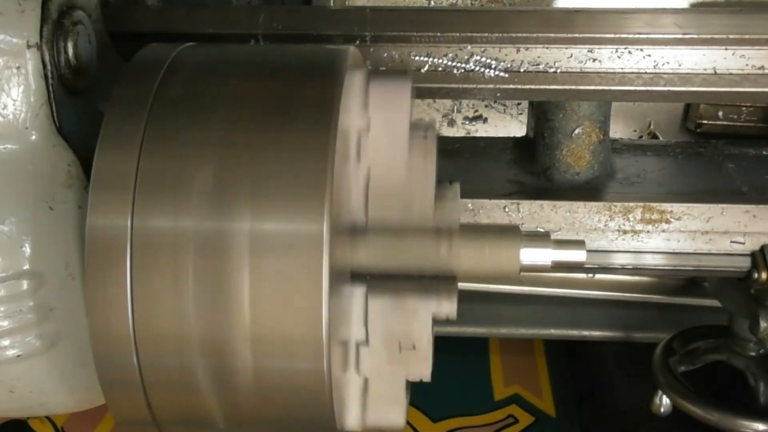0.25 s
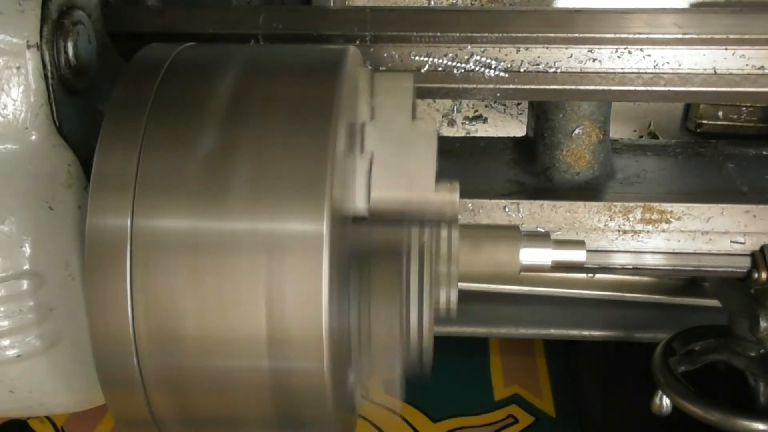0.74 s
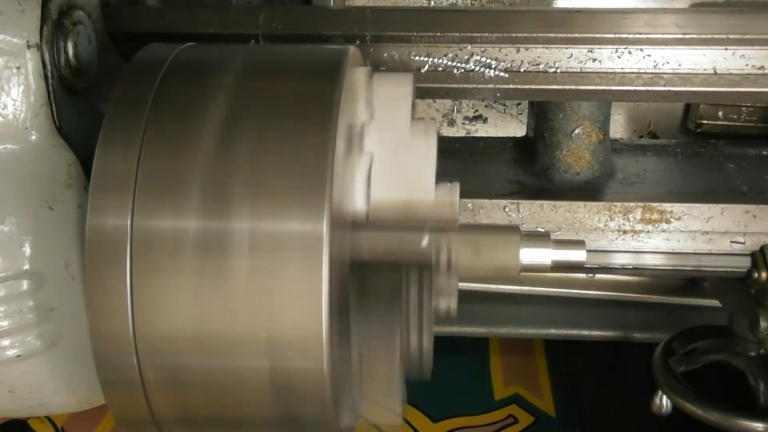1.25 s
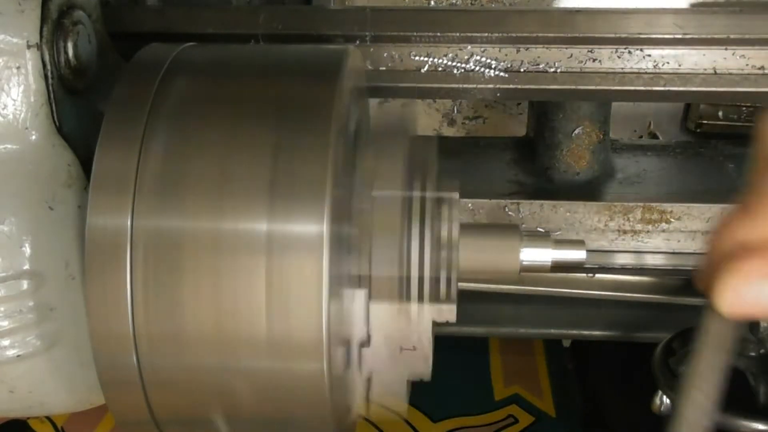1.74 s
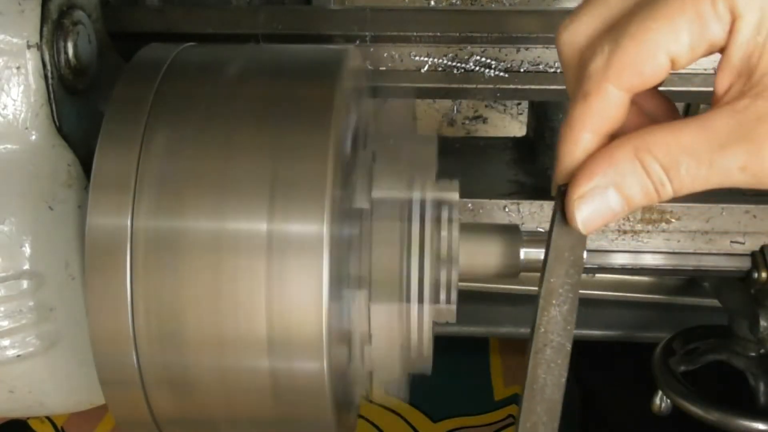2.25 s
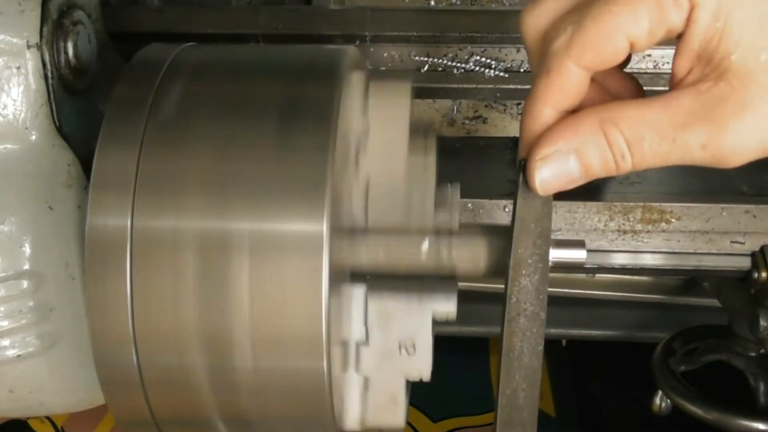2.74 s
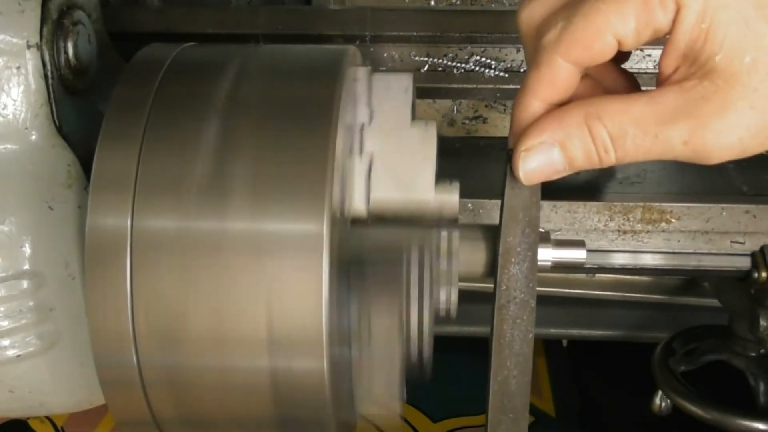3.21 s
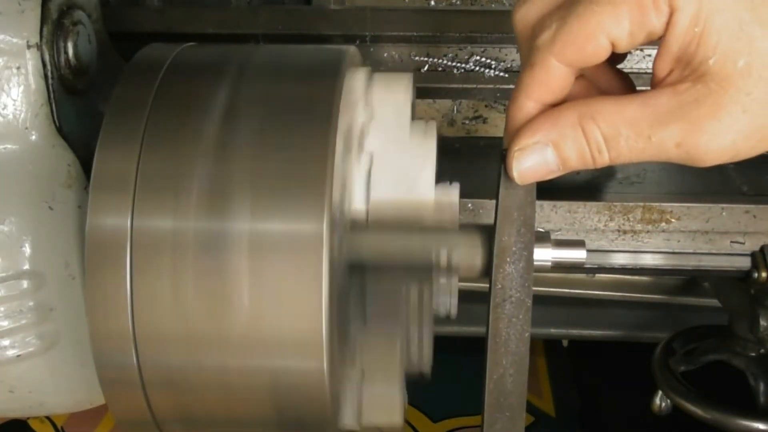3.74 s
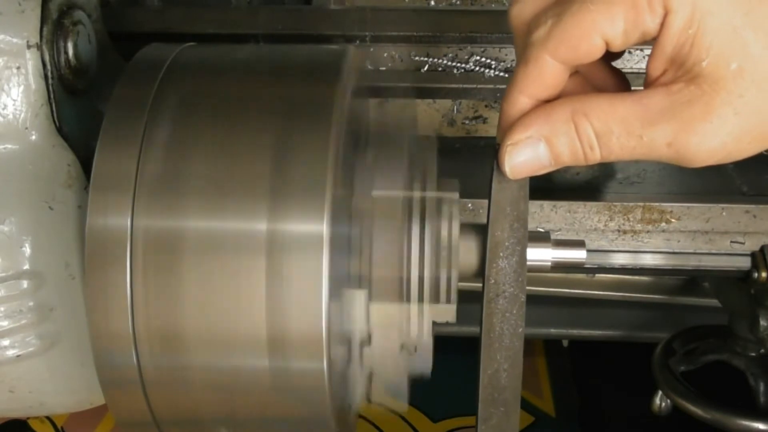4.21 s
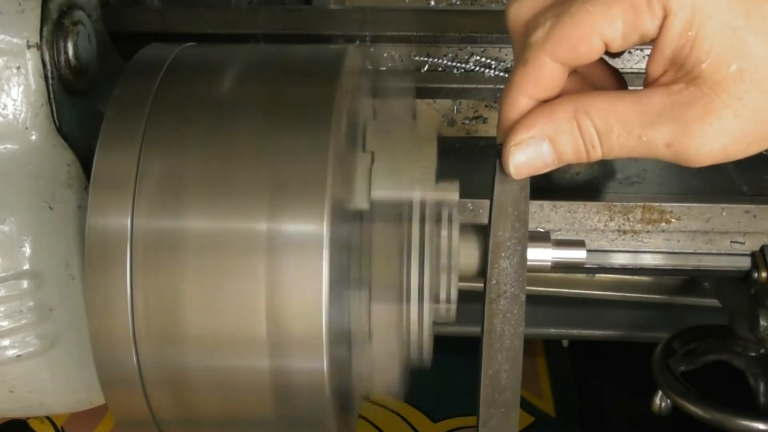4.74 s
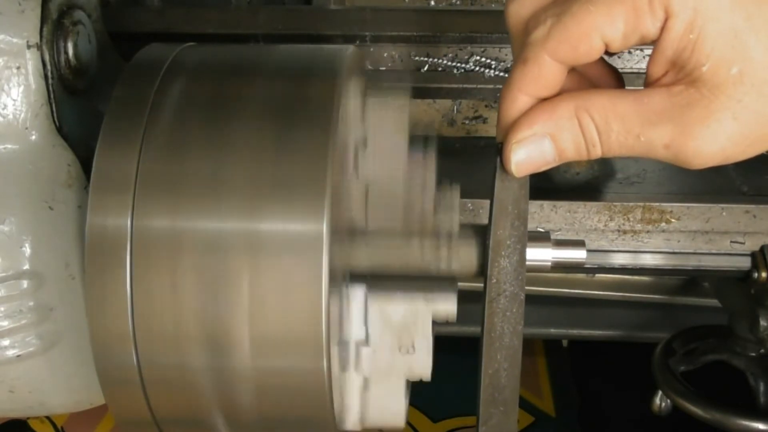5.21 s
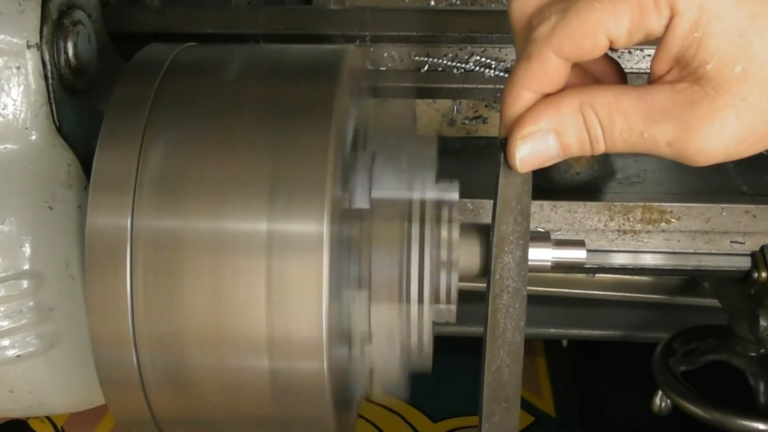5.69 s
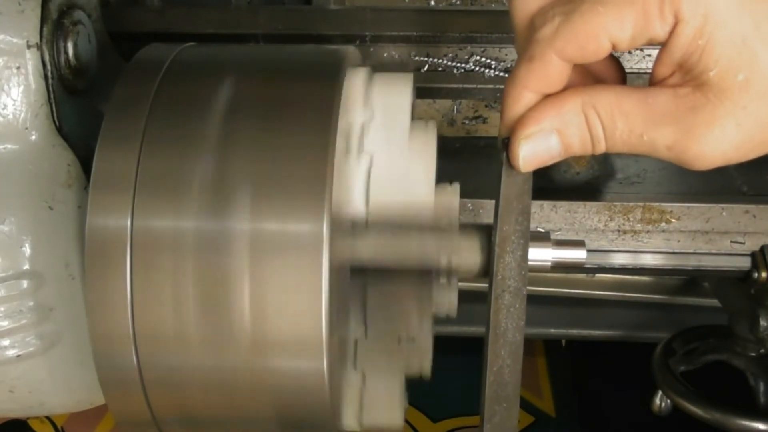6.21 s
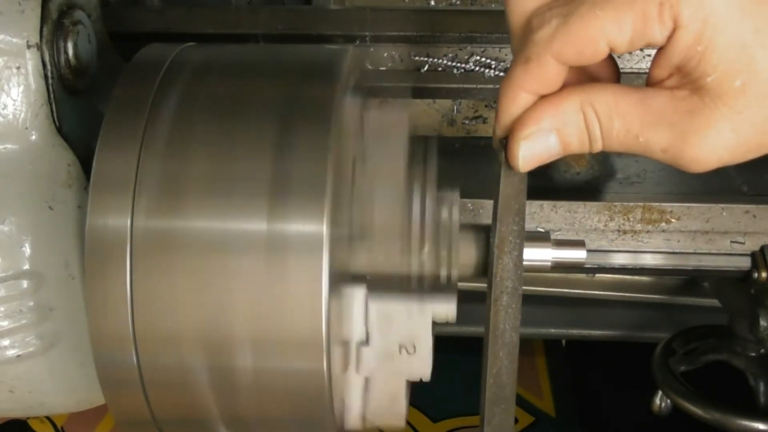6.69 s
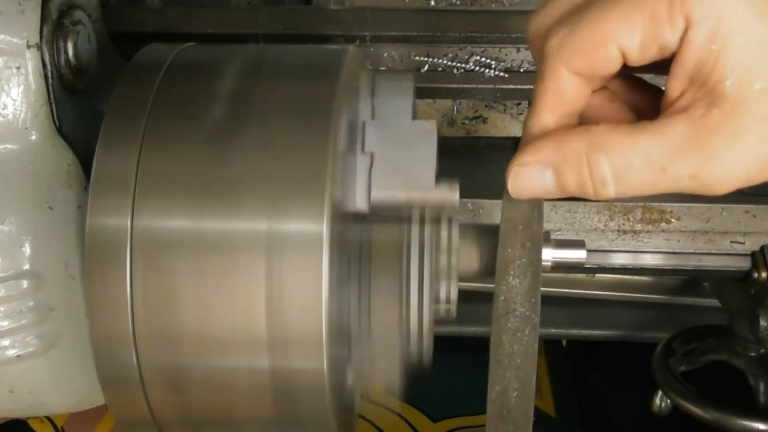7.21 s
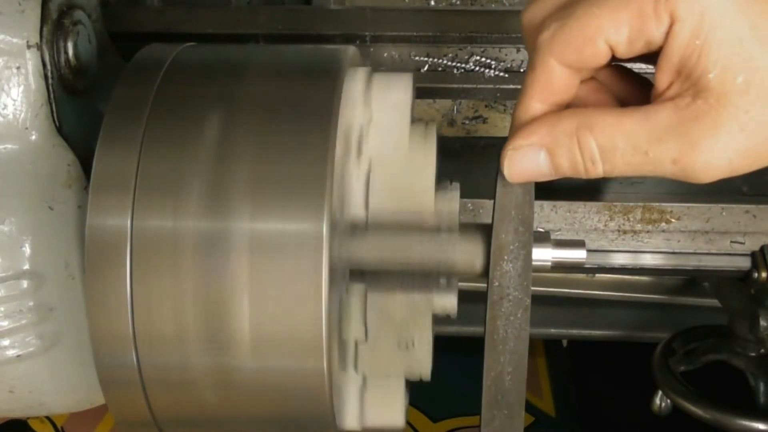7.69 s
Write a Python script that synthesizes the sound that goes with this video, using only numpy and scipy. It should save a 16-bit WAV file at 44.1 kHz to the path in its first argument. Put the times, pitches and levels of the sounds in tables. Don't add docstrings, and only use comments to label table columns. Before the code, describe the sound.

A small lathe runs throughout, close to the microphone: deep throbbing mains hum, rumbling bearings and a thin gear whine. Early on, a few soft grainy hisses as a file is wiped. After four seconds the file touches the spinning rod with a fast, buzzing metallic rasp and high ringing, lifts off near seven seconds, then bites again at the very end. Dry workshop, stereo.

```python
import sys
import numpy as np
from scipy import signal
from scipy.fft import rfft, irfft
from scipy.io import wavfile
from scipy.ndimage import uniform_filter1d

SR = 44100
rng = np.random.default_rng(int(sys.argv[2]) if len(sys.argv) > 2 else 0)


def generate_wav(sig):
    pcm = np.round(np.clip(np.atleast_2d(sig).T, -1, 1) * 32767).astype(np.int16)
    wavfile.write(sys.argv[1], SR, pcm)


def decibels_to_gain(level_db):
    exponent = np.asarray(level_db, float) / 20
    return 10 ** exponent


N = 350595
HUM_HZ = 120.03

# frequency_hz, width_hz, level_db
FILE_MODES = [(2034, 330, -12), (2416, 140, -9.5), (3600, 270, -12.5), (4480, 300, -18.5),
              (5840, 1200, -19.5), (6960, 68, -5), (7280, 160, -7), (7690, 98, -3.5), (7860, 210, -11),
              (8500, 190, -10), (8930, 220, -5), (10440, 260, -13.5)]


def unit(x):
    return x / np.sqrt(np.mean(x ** 2))


def curve(rows, off=None):
    s, *columns = np.transpose(rows)
    return [np.interp(np.arange(N) / SR, s, c, off, off) for c in columns]


def over(rows, hz):
    table_hz, level = np.array(rows).T
    return np.interp(np.log(hz + 1), np.log(table_hz), level)


def colour(x, rows, size=2048):
    log_gain = over(rows, np.linspace(0, SR / 2, size // 2 + 1)) * np.log(10) / 20
    cepstrum = irfft(log_gain)
    cepstrum[1:size // 2] *= 2
    cepstrum[size // 2 + 1:] = 0
    response = irfft(np.exp(rfft(cepstrum)))
    return signal.fftconvolve(x, response)[:N]


def resonate(x, modes):
    total = 0
    for k, (hz, width_hz, level_db) in enumerate(modes):
        b, a = signal.iirpeak(hz, hz / width_hz, SR)
        total = total + (-1) ** k * decibels_to_gain(level_db) * signal.lfilter(b, a, x)
    return total


def walk(rate_hz):
    k = int(SR / rate_hz)
    held = np.repeat(rng.standard_normal(N // k + 1), k)
    return uniform_filter1d(uniform_filter1d(held, k), k)[:N]


def pair(hz, pan_db, lead_rad):
    sides = np.array([[.5], [-.5]])
    beat_crest_s = .027
    phase = 2 * np.pi * hz * (np.arange(N) / SR - beat_crest_s)
    return np.sqrt(2) * decibels_to_gain(pan_db * sides) * np.cos(phase + lead_rad * sides)


def spread(mid, side):
    # frequency_hz, likeness (0-1)
    likeness = [(30, .2), (55, 1), (130, 0.94), (290, 1), (640, 0.74), (1410, .83), (3100, 0.94), (6820, 1),
                (10000, 0.78), (15000, .2)]
    # frequency_hz, left_minus_right_db
    balance = [(110, 2), (380, -4), (700, -2.5), (1290, 2), (2380, 2), (4400, -1), (15000, 2.5)]
    hz = np.linspace(0, SR / 2, N // 2 + 1)
    like = np.clip(over(likeness, hz), 0, 1)
    shared = rfft(mid)
    opposed = np.sqrt((1 - like) / (1 + like)) * rfft(side)
    lean = decibels_to_gain(over(balance, hz) / 2)
    return np.array([irfft((shared + opposed) * lean, N), irfft((shared - opposed) / lean, N)])


def room(x):
    t60_s = 0.084
    t = np.arange(int(.4 * SR)) / SR
    decay = np.exp(-np.log(1000) * t / t60_s) * (t > .003)
    tails = rng.standard_normal((2, len(t))) * decay
    return signal.fftconvolve(x[None], tails / np.sqrt(np.sum(tails[0] ** 2)), axes=1)[:, :N]


def rumble():
    # frequency_hz, density_db (per Hz)
    machine = [(25, -87), (75, -71), (150, -61), (300, -69), (600, -75), (900, -78), (1350, -78),
               (1600, -85.5), (3500, -90), (5000, -98.5), (7500, -92.5), (9300, -99.5), (11500, -106),
               (16000, -119)]
    # frequency_hz, width_hz, level_db (over the rumble)
    orders = [(327.2, 5.7, 6.5), (451.7, 6.3, 12), (534.8, 7, 7.5), (573, 5, 9.5), (605, 7.6, 6.5),
              (717.4, 3.5, 12.5), (802, 3.5, 1), (843, 7.9, 5), (927, 1.5, -3), (976, 6.5, 8.5)]
    # frequency_hz, width_hz, level_db (over the rumble)
    guards = [(1890, 190, -4), (2228, 21, 10), (3062, 26, 4.5), (3920, 25, 11), (5360, 15, 4),
              (6640, 30, 4), (8960, 72, 3), (14100, 100, 3.5)]
    # time_s, level_db
    swell = [(0, -2), (1, -0.5), (2, -0.5), (4, 0.5), (6.8, 1.5), (7.95, 2)]
    noise = rng.standard_normal((2, N)) * np.sqrt(SR / 2)
    low = signal.lfilter(*signal.butter(2, 1200, fs=SR), noise)
    pulse_db = 0.83 * np.cos(2 * np.pi * HUM_HZ * np.arange(N) / SR)
    high_db = 0.21 * walk(9) + pulse_db + curve(swell)[0]
    noise = low * decibels_to_gain(0.69 * walk(6)) + (noise - low) * decibels_to_gain(high_db)
    mid, side = (colour(n + resonate(n, orders + guards), machine) for n in noise)
    return spread(mid, side)


def gears():
    # frequency_hz, level_db, left_minus_right_db, left_lead_rad
    overtones = [(179.66, -48.5, -.3, -.2), (210.26, -53, -2, -.2), (240.07, -52, -2, -.3),
                 (269.89, -50, -3.6, .1), (357.72, -49, -2.4, .1), (360.09, -48, -7, .6),
                 (368.06, -55, -3.6, 0), (480.13, -55, -4.6, .3), (509.95, -55, -5, .4),
                 (600.15, -57, -6, 1.6), (953.8, -60, .7, .5), (1431, -62, 2.7, .4)]
    # frequency_hz, left_minus_right_db, left_lead_rad
    mesh = [
        (1044.15, 1.6, .34),
        (1311.65, -1, .39),
    ]
    # time_s, low_whine_db, high_whine_db
    whine = [(0, -60, -51.5), (1.7, -54.5, -49), (1.95, -50, -48), (4, -51, -48), (7.95, -49.5, -46.5)]
    tones = sum(pair(hz, pan_db, lead) * decibels_to_gain(db + 0.4 * walk(3)) for hz, db, pan_db, lead in overtones)
    whines = sum(pair(*tooth) * decibels_to_gain(db + 0.31 * walk(6.6)) for tooth, db in zip(mesh, curve(whine)))
    return decibels_to_gain(0.27) * tones + whines


def hum():
    # time_s, level_db
    motor = [(0, -19), (3.65, -18.5), (4.05, -19), (4.96, -18), (7.95, -18)]
    # offset_hz, level_db (re the hum), first_crest_s
    throb = [(-15.98, -35.6, 0.034), (-10.52, -35.5, 0.095), (-7.97, -22.1, 0.003), (-3.35, -35.2, 0.141),
             (3.36, -33.8, 0.02), (7.96, -18.8, 0.01), (10.52, -30.6, 0.061), (15.41, -30.3, 0.026),
             (15.92, -29.2, 0.04), (23.4, -26.6, 0.008), (25.95, -33.6, 0.034), (29.8, -29.3, 0.02),
             (31.87, -31.9, 0.024), (39.33, -39.1, 0.024), (47.81, -34.0, 0.001)]
    flutter_db, flutter_hz, pan_db = -27, 30.43, -1.47
    t = np.arange(N) / SR
    shake = 1 + sum(decibels_to_gain(db) * np.exp(2j * np.pi * hz * (t - crest_s)) for hz, db, crest_s in throb)
    shake = shake + decibels_to_gain(flutter_db) * (walk(flutter_hz) + 1j * walk(flutter_hz))
    wave = np.sqrt(2) * np.real(shake * np.exp(2j * np.pi * HUM_HZ * t))
    return wave * decibels_to_gain(curve(motor)[0] + np.array([[pan_db], [-pan_db]]) / 2)


def wipes():
    # time_s, level_db
    strokes = [
        [(0, -53.5), (.09, -67.5), (.158, -42.5), (.208, -45.5), (.262, -59.5), (.304, -49.5), (.384, -44.5),
         (.44, -63.5)],
        [(.58, -73.5), (.586, -45), (.678, -36), (.735, -44.5), (.82, -67.5), (.826, -48.5), (.892, -54),
         (.91, -68)],
    ]
    # frequency_hz, density_db (per Hz)
    hiss = [(2500, -27), (3700, -13), (4900, -19.5), (6200, -12), (7200, -1), (8600, -1.5), (10500, -11.5),
            (15800, -22.5)]
    grain = decibels_to_gain(2.5 * walk(250))
    level = sum(decibels_to_gain(curve(stroke, off=-150)[0]) for stroke in strokes)
    return unit(colour(rng.standard_normal(N) * grain, hiss)) * level


def passes():
    # first_pass_s, last_pass_s, rate_hz
    strokes = [
        (4.074, 4.19, 45.2),
        (4.2037, 6.41, 45.485),
        (6.4246, 6.72, 45.1),
        (7.6845, 7.949, 45.95),
    ]
    # time_s, drag_db (teeth), bounce_db (off the high spot),
    # weight_db (behind the blow), looseness_db (lets the file ring)
    hand = [
        [(4.07, -54, -39.5, -4, 10.5), (4.25, -44, -38.5, -3, 1), (4.8, -44, -35.5, -6.5, 0),
         (5.2, -41.5, -41, -1, -3), (5.65, -43.5, -36.5, -7, -2), (6.37, -42, -48, -10, -2.5),
         (6.42, -41, -33, 0, -4), (6.63, -38, -30, 2, 3.5), (6.72, -47, -41.5, 9.5, 10.5)],
        [(7.68, -50, -41.5, 5, 13), (7.82, -41, -38.5, 1.5, 6), (7.95, -41.5, -35, -0.5, -1)],
    ]
    # time_s, extra_db
    jolts = [(4.27, 5.5), (4.358, 6), (4.467, 5), (4.512, 7), (4.644, 1.5), (4.731, 3.5), (4.775, 5),
             (4.841, 6.5), (4.995, 8.5), (5.04, 0), (5.281, 6.5), (5.302, 8.5), (5.347, 7), (5.458, 0.5),
             (5.634, 4), (7.685, 5.5), (7.793, 5), (7.946, 2.5)]
    s = np.concatenate([np.arange(first, last, 1 / rate) for first, last, rate in strokes])
    chance = rng.standard_normal((len(s), 5)).T
    at, *controls = np.transpose(sum(hand, []))
    drag, bounce, weight, loose = (np.interp(s, at, c) for c in controls)
    jolt = np.zeros(len(s))
    for when, extra_db in jolts:
        jolt[np.argmin(abs(s - when))] += extra_db
    blow = bounce + jolt
    knock_db = blow + 1.6 * chance[1]
    thud_db = blow + weight + 1.3 * chance[2]
    scrape_db = drag + 1.2 * chance[3]
    ring_db = drag + loose + .3 * jolt + 1.6 * chance[4]
    return s + .0004 * chance[0], knock_db, thud_db, scrape_db, ring_db


def groan(hits):
    # frequency_hz, width_hz, level_db
    headstock = [(237, 36, -5), (272.2, 8.8, 4.5), (321, 36, -4), (407, 40, -6.5), (452, 30, -7),
                 (548, 80, -12), (780, 230, -16.5)]
    # time_s, level_db
    press = [
        [(4.06, -51), (4.25, -36), (5.45, -37), (5.6, -41), (6.3, -47), (6.45, -39), (6.68, -33.5), (6.76, -36)],
        [(7.67, -35), (7.95, -40)],
    ]
    push = unit(hits) + decibels_to_gain(-6.5) * rng.standard_normal(N)
    level = sum(decibels_to_gain(curve(p, off=-150)[0] - 5.5) for p in press)
    return unit(resonate(push, headstock)) * level


def ring(bite, ring_db, chatter_hz):
    phase = 2 * np.pi * np.cumsum(chatter_hz + 95 * walk(180)) / SR
    chatter = np.cos(phase) * decibels_to_gain(3.6 * walk(400) + 1.7 * walk(120))
    gripped = resonate(chatter * bite * decibels_to_gain(ring_db + 0.5), [(2950, 130, -1)])
    return gripped + resonate(gripped, [(2950, 8, -3.5)])


def scrape(bite, scrape_db, tip_db, force):
    # frequency_hz, width_hz, level_db
    tip_modes = [(11560, 290, -20), (13130, 190, -16.5), (14200, 900, -29.5), (15700, 200, -29.5)]
    teeth = decibels_to_gain(1.27 * walk(600))
    drag = rng.standard_normal(N) * teeth * bite * decibels_to_gain(scrape_db + 15.5)
    tip = resonate(drag + decibels_to_gain(10.0) * force, tip_modes)
    return resonate(drag, FILE_MODES) + decibels_to_gain(tip_db) * tip


def impact_force(hits, since, knock_db, thud_db):
    rebound = np.roll(hits, int(.003 * SR))
    blow = decibels_to_gain(22.5) * (hits + decibels_to_gain(-6) * rebound)
    rattle = np.exp(-(since / 0.0015) ** 2) + decibels_to_gain(-11) * np.exp(-since / 0.0061)
    strike = blow + decibels_to_gain(6.5) * rng.standard_normal(N) * rattle
    thud_hz = 5000
    dull = signal.lfilter(*signal.butter(3, thud_hz, fs=SR), decibels_to_gain(thud_db + 1.5) * strike)
    bright = signal.lfilter(*signal.butter(3, thud_hz, "high", fs=SR), decibels_to_gain(knock_db) * strike)
    return dull + bright


def knock(force):
    # frequency_hz, density_db (per Hz)
    blow = [(900, -19.5), (1600, -4.5), (2500, 5.5), (3800, 0), (4600, -4), (6000, -7.5), (7500, 3),
            (9000, -9), (10500, -9), (12000, -25), (13000, -21.5), (14500, -29), (16000, -33)]
    return colour(force, blow) + decibels_to_gain(9) * resonate(force, FILE_MODES)


def filing():
    # since_knock_s, level_db
    bite_shape = [(0, 8), (.002, 4.5), (.009, 3), (.014, -7), (.018, -10), (.024, -2)]
    # time_s, chatter_hz, tip_db (brightness)
    grip = [(4.06, 2930, 2), (5.4, 2950, -3), (6.35, 2950, -1), (6.45, 2950, -6.5), (6.76, 2964, -4),
            (7.67, 2930, 0), (7.95, 2950, 0.5)]
    # frequency_hz, gain_db
    grille = [(1000, -1.5), (13500, -0.5), (14800, -14.5), (15600, -1)]
    s, knock_db, thud_db, scrape_db, ring_db = passes()
    chatter_hz, tip_db = curve(grip)
    t = np.arange(N) / SR
    hits = np.zeros(N)
    hits[(s * SR).astype(int)] = 1
    last = np.maximum(np.cumsum(hits).astype(int) - 1, 0)
    since = np.where(t >= s[0], np.maximum(t - s[last], 0), 1)
    bite = decibels_to_gain(np.interp(since, *np.transpose(bite_shape), right=-150))
    force = impact_force(hits, since, knock_db[last], thud_db[last])
    scraping = scrape(bite, scrape_db[last], tip_db, force)
    ringing = ring(bite, ring_db[last], chatter_hz)
    return colour(knock(force) + scraping + ringing, grille) + groan(hits)


def scene():
    # frequency_hz, gain_db
    diffuse = [(200, -9), (1000, -2), (3000, -22), (6000, -15.5), (9000, -16), (12000, 1), (16000, -6)]
    hand = wipes() + filing()
    echo, wide = room(hand)
    near = (hand + decibels_to_gain(-10) * echo) * decibels_to_gain([[-.4], [.4]])
    hand = near + colour(wide, diffuse) * np.array([[1], [-1]])
    return hum() + gears() + rumble() + hand


def top_cut(x):
    return signal.sosfilt(signal.butter(12, 15940, fs=SR, output="sos"), x)


def record(dry):
    lowpass = signal.ellip(8, .2, 70, 15850, fs=SR, output="sos")
    mix = signal.sosfilt(lowpass, dry)
    return top_cut(mix)


dry = scene()
out = record(dry)
generate_wav(out)
```